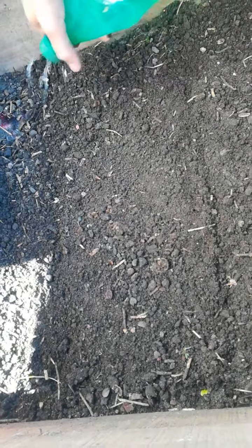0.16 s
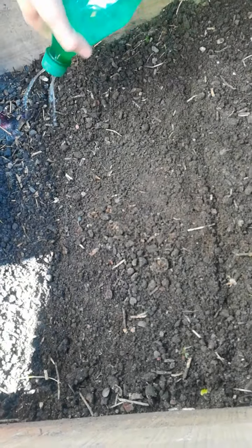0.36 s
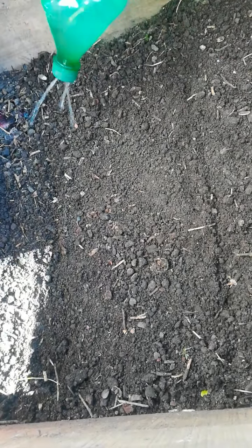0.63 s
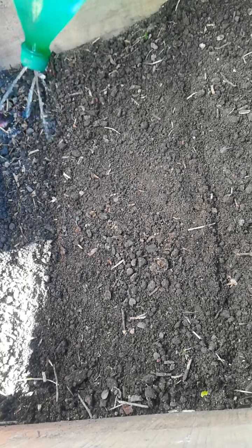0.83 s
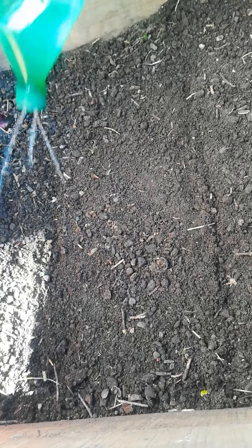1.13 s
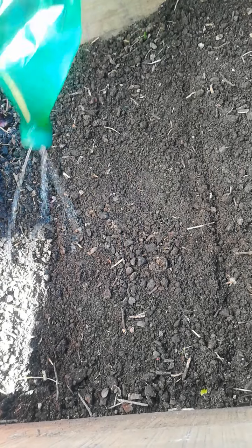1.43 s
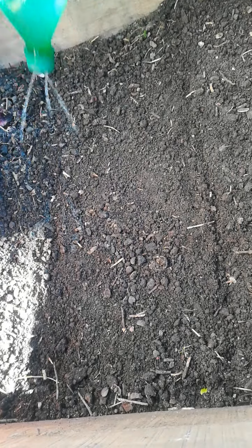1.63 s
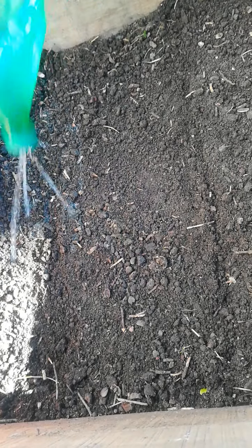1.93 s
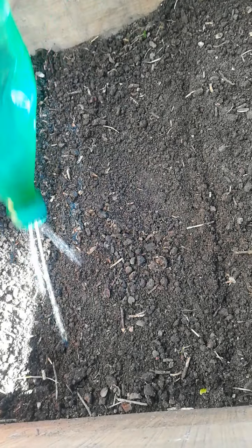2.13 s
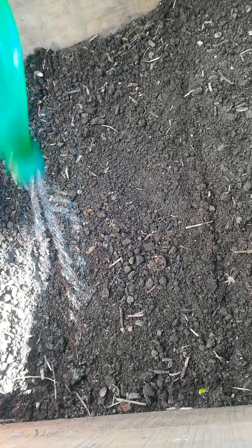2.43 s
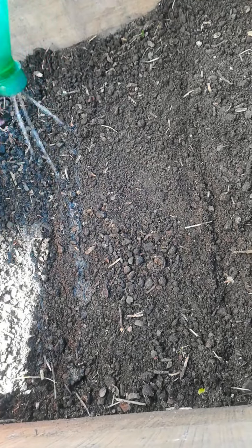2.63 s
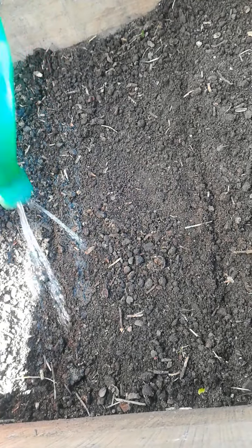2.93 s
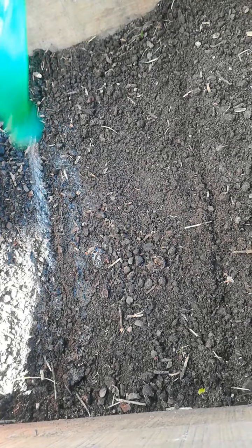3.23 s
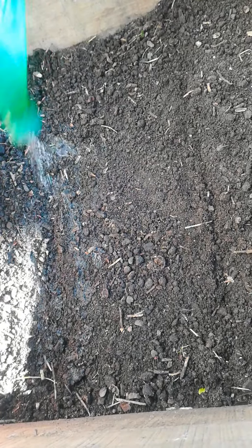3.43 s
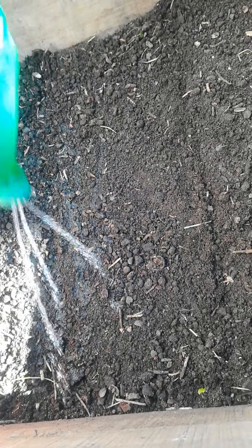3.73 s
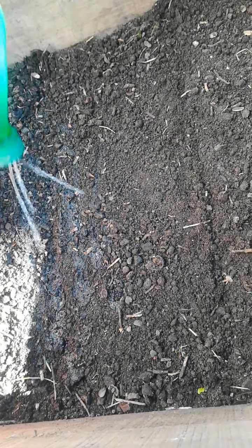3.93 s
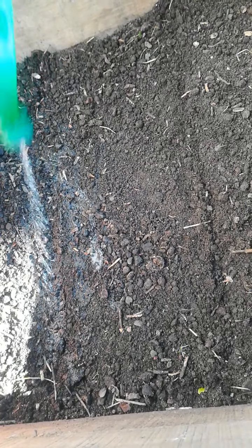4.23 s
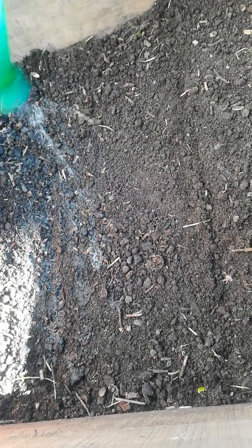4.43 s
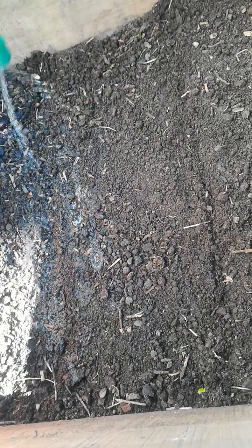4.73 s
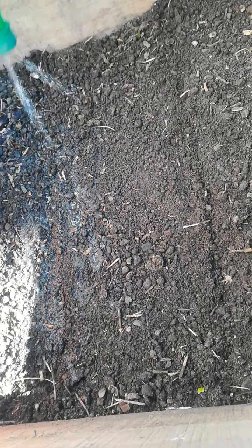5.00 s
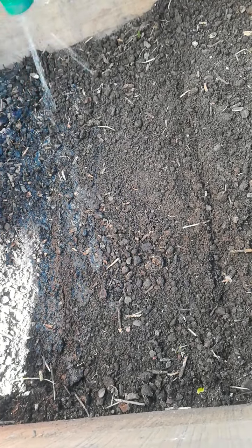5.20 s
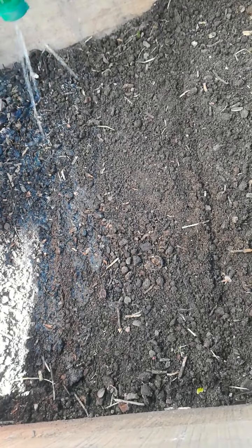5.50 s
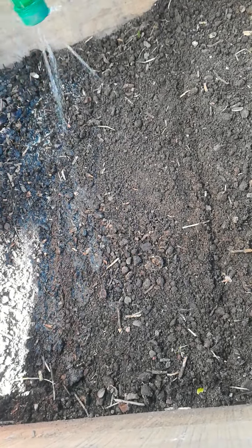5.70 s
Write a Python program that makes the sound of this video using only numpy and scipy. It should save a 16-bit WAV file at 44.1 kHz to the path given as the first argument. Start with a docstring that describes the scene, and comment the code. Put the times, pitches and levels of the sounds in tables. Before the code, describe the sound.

Thin water jets hiss softly and patter onto loose soil close on the left, with sharp plastic bottle clicks and a louder final swish.

```python
"""Garden, outdoors: a plastic bottle with a perforated cap is squeezed over loose soil, close by on the left.
Shaped noise makes the hiss, mist and swish of thin jets; short noise splats patter on the crumbs, bubbles ring.
The bottle wall buckles with sharp clicks, built from struck modes; a last spurt swishes louder.
Noise with bass-heavy spectra makes light gusts on the microphone, over a quiet outdoor background."""
import sys
import numpy as np
from scipy import signal
from scipy.fft import rfft, irfft
from scipy.io import wavfile

SR = 44100
rng = np.random.default_rng(int(sys.argv[2]) if len(sys.argv) > 2 else 0)


def unload_audio(sound):
    """Save the sound as a 16-bit wav file, at the path given as the first command line argument."""
    columns = np.transpose(np.atleast_2d(sound))
    # keep every value between -1 and 1, then stretch to whole-number steps
    steps = np.round(np.clip(columns, -1, 1) * 32767)
    wavfile.write(sys.argv[1], SR, steps.astype(np.int16))


N = 258186
TIME = np.arange(N) / SR
FREQS = np.maximum(np.arange(N // 2 + 1) * SR / N, 1)
SHORT = TIME[:4096]   # time axis of one short sound
PORE_WIDTH = 0.14   # bandwidth of a pore's resonance as a share of its pitch


def from_db(db):
    """Decibels to gain."""
    return 10 ** (np.asarray(db) / 20)


def rms_one(x):
    """Scale to unit rms."""
    return x / np.sqrt(np.mean(x ** 2) + 1e-20)


def level_curve(rows):
    """Read rows of time and decibels as a gain at every sample."""
    times, level_db = np.transpose(rows)
    return from_db(np.interp(TIME, times, level_db))


def swells(rows, with_offset=False):
    """Each event swells to its height and dies away; powers add. The last dB column may offset the levels."""
    shape = 1.18   # 1 = pointed swells with long skirts, 2 = bell-shaped
    power = np.zeros(N)
    for row in rows:
        s, level_db, rise, fall = row[:4]
        away = np.abs(TIME - s) / np.where(TIME < s, rise, fall)
        offset_db = row[-1] if with_offset else 0
        swell = from_db(level_db + offset_db) * np.exp(-np.minimum(away, 20) ** shape)
        power += swell ** 2
    return np.sqrt(power)


def drift(rate):
    """Random values, rate per second, joined by straight lines."""
    knots = rng.standard_normal(4000)
    return np.interp(TIME * rate, np.arange(len(knots)), knots)


def at_hz(points):
    """Read a short spectrum at every frequency, on a logarithmic axis."""
    hz, value = np.transpose(points)
    return np.interp(np.log(FREQS), np.log(hz), value)


def coloured(x, spectrum):
    """Give a noise a spectrum; rms 1."""
    return rms_one(irfft(rfft(x) * from_db(at_hz(spectrum)), N))


def resonate(x, hz, width_hz):
    """A two-pole resonance with gain about 1 at its top."""
    r = np.exp(-np.pi * width_hz / SR)
    zeros = np.array([1, 0, -1]) * (1 - r * r) / 2
    poles = [1, -2 * r * np.cos(2 * np.pi * hz / SR), r * r]
    return signal.lfilter(zeros, poles, x + 1e-18)


def ping(hz, t60, delay=0):
    """A struck mode: a sine that starts at height 1 and dies by 60 dB in t60."""
    t = np.maximum(SHORT - delay, 0)
    return np.sin(2 * np.pi * hz * t) * np.exp(-np.log(1000) * t / t60)


def add(track, s, sound):
    """Lay a short sound into a track."""
    i = max(int(s * SR), 0)
    track[i:i + len(sound)] += sound[:N - i]


def diffuse(x, envelope):
    """Many small reflections under an envelope, different at each port; unit energy."""
    tail = rng.standard_normal((2, len(envelope))) * envelope
    tail /= np.linalg.norm(tail, axis=1, keepdims=True)
    return signal.fftconvolve(x[None], tail, axes=1)[:, :N]


def from_left(x, scatter_db):
    """Soil and paving scatter a brief tail; the shaded right port hears it all later, softer and duller."""
    right_lag_s, right_db, shadow_hz = .00055, -6, 11000
    envelope = (np.exp(-SHORT / 0.0046) + 0.19 * np.exp(-SHORT / 0.019)) * (SHORT > .0007)
    direct = np.array([x, np.interp(TIME - right_lag_s, TIME, x)])
    left, right = direct + from_db(scatter_db) * diffuse(x, envelope)
    shaded = signal.lfilter(*signal.butter(1, shadow_hz, fs=SR), right)
    return np.array([left, from_db(right_db) * shaded])


def yard(x, echo_db=-24, t60=0.65, dull_hz=2000):
    """Walls round the garden return a faint, dull tail."""
    t = TIME[:SR]
    dull = signal.lfilter(*signal.butter(1, dull_hz, fs=SR), x)
    return from_db(echo_db) * diffuse(dull, np.exp(-np.log(1000) * t / t60) * (t > .012))


def air_noise(spectrum):
    """Noise from all around, most alike in the two ports in the bass."""
    # likeness of the two ports: pitch_hz, correlation (-1 to 1)
    air_likeness = [(50, 0.98), (150, 0.93), (300, 0.38), (600, -0.58), (1500, 0.13), (16000, -0.13)]
    alike = np.clip(at_hz(air_likeness), -1, 1)
    mid, side = rfft(rng.standard_normal((2, N)))
    common = np.sqrt(1 + alike) * mid
    opposed = np.sqrt(1 - alike) * side
    return coloured(irfft([common + opposed, common - opposed], N), spectrum)


def outdoors():
    """A wavering breeze and a few gusts rumble and flutter on the microphone over the far background."""
    # breeze between the gusts: start_s, rumble_db (before the rumble's trim)
    breeze_levels = [(0, -59), (1.0, -58.5), (2.2, -58), (3.3, -59), (4.4, -62.5), (5.1, -59.5),
                     (5.85, -59)]
    # gusts: height_s, rumble_db (before trim), rise_s, fall_s, flutter_db (relative to the rumble)
    gusts = [(.705, -33, 0.02, .025, -15), (.78, -43, 0.016, 0.018, -11), (1.9, -43, 0.028, 0.056, -11),
             (2.17, -47, 0.086, 0.05, -20), (2.79, -40, 0.091, 0.097, -7.5),
             (2.86, -45, 0.011, 0.024, 10.5), (2.98, -51, .01, .012, 10), (3.035, -42.5, 0.043, 0.064, -2),
             (3.54, -41.5, 0.039, 0.06, -16), (4.76, -55.5, 0.045, .03, -4),
             (5.07, -59.5, 0.015, 0.046, 6.5), (5.295, -59.5, 0.018, 0.034, 16)]
    # relative spectra of rumble, flutter and far garden: pitch_hz, level_db
    rumble_spectrum = [(15, -10.5), (30, 2), (60, 1.5), (100, -1.5), (140, -28.5), (250, -61), (2000, -100)]
    flutter_spectrum = [(70, -14.5), (120, 4), (160, -1), (220, -10.5), (320, -23), (500, -38.5),
                        (1000, -36), (6000, -100)]
    garden_spectrum = [(100, -4), (250, 1), (400, -2), (600, -3.5), (900, -2.5), (1300, -5.5), (2000, -9),
                       (3500, -12.5), (7000, -18.5), (11000, -20.5), (15000, -22.5)]
    waver_db, wavers_per_s = 2.5, 21
    breeze_flutter_db, garden_db = -5, -65.5   # the flutter is relative to the rumble
    breeze = level_curve(breeze_levels) * from_db(waver_db * drift(wavers_per_s))
    rumble = np.hypot(breeze, swells(gusts))
    flutter = np.hypot(from_db(breeze_flutter_db) * breeze, swells(gusts, with_offset=True))
    wind = from_db(1.5) * rumble * air_noise(rumble_spectrum)
    wind = wind + from_db(1.0) * flutter * air_noise(flutter_spectrum)
    return wind + from_db(garden_db) * air_noise(garden_spectrum)


def patter(per_s=260, size_db=9.5, spit_db=-20, splat_s=0.00091, count=14):
    """Countless droplets of uneven size splat on crumbs of many pitches; rms 1."""
    sizes = from_db(size_db * np.minimum(rng.exponential(1, N), 2.6))
    landed = sizes * (rng.random(N) < per_s / SR)
    dealt = rng.integers(0, count, N)   # which pitch each droplet gets
    fizz = rng.standard_normal(N)
    decay = [1, -np.exp(-1 / (splat_s * SR))]
    out = np.zeros(N)
    for k, hz in enumerate(np.linspace(4200, 8800, count)):
        burst = fizz * signal.lfilter([1], decay, landed * (dealt == k) + 1e-18)
        out += resonate(burst, hz, PORE_WIDTH * hz) + from_db(spit_db) * burst
    return rms_one(signal.sosfilt(signal.butter(2, [2600, 10500], "band", fs=SR, output="sos"), out))


def spray(soak_db=-6, mist_db=0, flicker_db=8.0, grain_db=4.0):
    """The jets soak in with a grainy hiss; thrown water adds fine mist and a lagging patter."""
    # steady flow of the jets onto the soil: start_s, hiss_db (before trim)
    flow_levels = [(0, -68), (.1, -75.5), (.28, -68.5), (.42, -72.5), (.65, -68), (1.0, -73), (1.33, -70),
                   (1.55, -76.5), (2.2, -73), (3.0, -77.5), (3.35, -80), (3.62, -74), (3.78, -77),
                   (4.3, -74), (4.53, -81), (5.85, -69.5)]
    # extra water thrown by a shake or squeeze:
    # height_s, hiss_db (before trim), rise_s, fall_s, mist_db (relative to the hiss)
    splashes = [(.72, -66, 0.13, .04, 1.5), (.9, -66, 0.086, 0.044, 0.5), (2.0, -65.5, 0.066, 0.1, 2.5),
                (3.09, -62, 0.035, 0.031, -3), (4.19, -69, .03, 0.02, -2), (4.65, -68, 0.033, 0.066, -1),
                (5.0, -70, 0.035, 0.03, -8), (5.28, -61.5, 0.087, 0.056, -10), (5.5, -52, 0.14, 0.1, -5),
                (5.63, -57.5, 0.093, 0.073, 4)]
    # relative spectra of hiss and mist: pitch_hz, level_db
    hiss_spectrum = [(700, -37), (1500, -16), (2500, -9), (4000, -6.5), (5500, -4), (6700, -3.5),
                     (8000, -4.5), (9500, -22), (11000, -35), (16000, -27)]
    mist_spectrum = [(3000, -28), (6000, 12), (9000, 8), (11000, -2), (15500, 1)]
    flow_mist_db, flow_patter_db, splash_patter_db = -11, 0.5, 6.5   # relative to the hiss before trim
    patter_lag_s = 0.023   # thrown water breaks into drops, which land a little after the hiss
    flow = level_curve(flow_levels)
    thrown = swells(splashes)
    landed = np.interp(TIME - patter_lag_s, TIME, thrown)
    hiss = np.hypot(flow, thrown)
    mist = np.hypot(from_db(flow_mist_db) * flow, swells(splashes, with_offset=True))
    breakup = np.hypot(from_db(flow_patter_db) * flow, from_db(splash_patter_db) * landed)
    flickering = rng.standard_normal(N) * from_db(flicker_db * drift(90))
    grainy = rng.standard_normal(N) * from_db(grain_db * drift(270))
    soak = from_db(soak_db) * hiss * coloured(flickering, hiss_spectrum)
    fine = from_db(mist_db) * mist * coloured(grainy, mist_spectrum)
    landing = from_left(soak + fine + breakup * patter(), scatter_db=-11)
    # spray spread over a wide patch, weaker on the right
    wash = from_db(4) * hiss * air_noise(hiss_spectrum) + from_db(3.5) * mist * air_noise(mist_spectrum)
    return landing + wash * from_db([[1], [-3]])


def bottle(crack_db=-7):
    """A fold runs across the wall: small stiff patches ring first, broad panels and the hollow body last."""
    # wall buckles: start_s, level_db, fold_run_s, centre_hz, spread_octaves, hollow_db, hollow_hz
    # (levels before the filters below)
    buckles = [(0.0117, -36.5, 0.0028, 1140, 0.42, -59, 606), (0.152, -53, 0.00071, 2800, 1.3, -75, 600),
               (1.052, -64, 0.0021, 900, .8, -50, 604), (1.347, -44.5, 0.0023, 900, 0.34, -52, 630),
               (1.855, -28.5, .002, 3100, 0.23, -52, 620), (1.856, -28.5, .001, 6860, 0.13, -72, 600),
               (2.021, -27, 0.0061, 1190, 0.79, -28, 610), (2.401, -44, 0.00091, 4700, 1.3, -46, 570),
               (3.018, -40, 0.00393, 865, 0.27, -37.5, 604), (3.481, -13.5, 0.0053, 2600, 1.7, -28, 630),
               (5.2794, -10, 0.0026, 4170, 2.26, -23.5, 648), (5.572, -42.5, 0.0045, 880, 0.14, -43, 650)]
    # modes of the thin wall: pitch_hz, level_db (relative), t60_s
    wall_modes = [(350, -6, 0.031), (440, -21, 0.019), (777, -2, 0.032), (874, -3, 0.025),
                  (1047, 0.5, 0.031), (1277, -0.5, 0.025), (1460, -1, 0.018), (1800, -1, 0.023),
                  (2260, -2, 0.017), (2540, 1.5, 0.012), (2800, 0, 0.017), (3285, 0, 0.01),
                  (3520, -8, 0.0089), (4440, 8.5, 0.01), (5070, 1, 0.0075), (5720, 4, 0.0096),
                  (6220, -1, 0.011), (6940, -6, 0.0037), (8100, -14, 0.0055)]
    hollow_t60_s = .036
    out = np.zeros(N)
    hz, mode_db, t60 = np.transpose(wall_modes)
    for s, level_db, run, centre_hz, spread, hollow_db, hollow_hz in buckles:
        weight = from_db(mode_db) * np.exp(-.5 * (np.log2(hz / centre_hz) / spread) ** 2)
        delay = run * (np.linspace(.75, 0, len(hz)) + .25 * rng.random(len(hz)))
        wall = sum(w * ping(f, t, d) for w, f, t, d in zip(weight, hz, t60, delay))
        wall = wall / np.linalg.norm(weight)
        crackle = rng.standard_normal(len(SHORT)) * np.exp(-SHORT / run)
        for _ in range(2):
            crackle = resonate(crackle, centre_hz, 0.41 * centre_hz * spread)
        crackle *= from_db(crack_db) * np.linalg.norm(wall) / np.linalg.norm(crackle)
        hollow = from_db(hollow_db) * ping(hollow_hz, hollow_t60_s, run)
        add(out, s, from_db(level_db) * (wall + crackle) + hollow)
    # the clicks carry little bass below 400 Hz
    out = signal.sosfilt(signal.butter(2, 400, "high", fs=SR, output="sos"), out)
    return signal.sosfilt(signal.butter(6, 7800, fs=SR, output="sos"), out)


def stray_drops():
    """Mostly smaller drops at random moments: rows of start_s, level_db (before trim), pitch_hz."""
    per_s, mean_db, spread_db = 5, -51, 3
    middle_hz, spread_octaves = 6970, 0.28
    chance = rng.standard_normal((200, 2))
    times = np.cumsum(rng.exponential(1 / per_s, len(chance)))
    return [(s, mean_db + spread_db * size, middle_hz * 2 ** (spread_octaves * pitch))
            for s, (size, pitch) in zip(times, chance) if s < TIME[-len(SHORT)]]


def drops(trim_db=5, spit_db=-21, low_hz=3600):
    """Each drop bursts in a tiny splat, coloured by the pore it hits; a few bubbles ring."""
    # biggest drops on the crumbs: start_s, level_db (before trim and filter), pitch_hz
    big_drops = [(0.5818, -40, 4400), (0.6626, -41.5, 6600), (0.8268, -43, 6200), (0.9713, -41.5, 6400),
                 (1.078, -40.5, 4600), (1.324, -47.5, 7940), (1.373, -46, 7500), (1.9649, -32.5, 6600),
                 (2.02, -37.5, 6600), (2.1237, -36.5, 8000), (3.077, -42, 5030), (3.132, -43, 7300),
                 (3.1502, -35.5, 6440), (3.731, -40.5, 7800), (3.919, -41, 7050), (4.0113, -42, 6300),
                 (4.1361, -38, 6100), (4.1869, -44, 6360), (4.6259, -34.5, 6860), (4.66, -39, 5730),
                 (4.8667, -46, 6350), (4.9556, -39.5, 6070), (5.018, -43, 5600), (5.1264, -43, 8040),
                 (5.339, -33, 6460), (5.5164, -36, 5850), (5.5356, -28.5, 6400), (5.6216, -27.5, 5940),
                 (5.6454, -32, 6600), (5.7297, -36, 6950), (5.801, -38, 4600)]
    # small bubbles at the cap: start_s, level_db, pitch_hz, t60_s
    cap_bubbles = [(0.027, -35, 4810, 0.025), (.153, -31.5, 2420, 0.027), (.166, -37.5, 4270, 0.015),
                   (.268, -42.5, 2910, 0.023), (1.085, -46, 3820, 0.022), (3.093, -41, 2950, 0.028),
                   (5.32, -40, 8100, 0.055), (5.324, -39, 5730, 0.031)]
    splat_s = 0.0008
    rise_per_s = 2.6   # a bubble's pitch climbs by this share of its start each second
    out = np.zeros(N)
    bursts = rng.standard_normal((120, len(SHORT))) * np.exp(-SHORT / splat_s)
    for (s, level_db, hz), burst in zip(big_drops + stray_drops(), bursts):
        splat = resonate(burst, hz, PORE_WIDTH * hz) + from_db(spit_db) * burst
        add(out, s + .001, from_db(level_db + trim_db) * splat / np.abs(splat).max())
    out = signal.sosfilt(signal.butter(2, [low_hz, 13000], "band", fs=SR, output="sos"), out)
    for s, level_db, hz, t60 in cap_bubbles:
        phase = 2 * np.pi * hz * SHORT * (1 + rise_per_s * SHORT / 2)
        add(out, s, from_db(level_db - 60 * SHORT / t60) * np.sin(phase))
    return out


def spurt():
    """Harder squeezes make the jets swish: noise through a few broad resonances."""
    # spurts: height_s, swish_db, rise_s, fall_s
    spurts = [(.735, -56.5, .015, 0.025), (1.67, -64.5, .04, .07), (3.9, -56.5, 0.043, 0.078),
              (4.02, -56.5, 0.05, .07), (4.62, -61, .025, 0.054), (5.28, -48, 0.043, 0.087),
              (5.46, -44.5, 0.081, 0.04)]
    # resonances of the swish: pitch_hz, width_hz, level_db (relative)
    spurt_modes = [(1120, 140, -2), (1800, 910, -11), (2600, 380, 1), (3400, 630, 3), (4130, 1600, -5.5),
                   (4600, 550, -31), (5850, 450, -1.5), (7040, 2000, -6.5)]
    rush = sum(from_db(db) * resonate(rng.standard_normal(N), hz, width) for hz, width, db in spurt_modes)
    band = signal.butter(3, [900, 8500], "band", fs=SR, output="sos")
    return swells(spurts) * rms_one(signal.sosfilt(band, rush))


def scene():
    """Bottle and water on the left, air all around."""
    snaps = bottle()
    clicks = from_left(snaps, scatter_db=-8) + yard(snaps)
    splats = from_left(drops(), scatter_db=-9)
    swish = from_left(spurt(), scatter_db=-5.5)
    return outdoors() + spray() + clicks + splats + swish


def record(dry):
    """The top is cut steeply just below 16 kHz."""
    return signal.sosfilt(signal.ellip(10, .1, 70, 15950, fs=SR, output="sos"), dry)


dry = scene()
out = record(dry)
unload_audio(out)
```